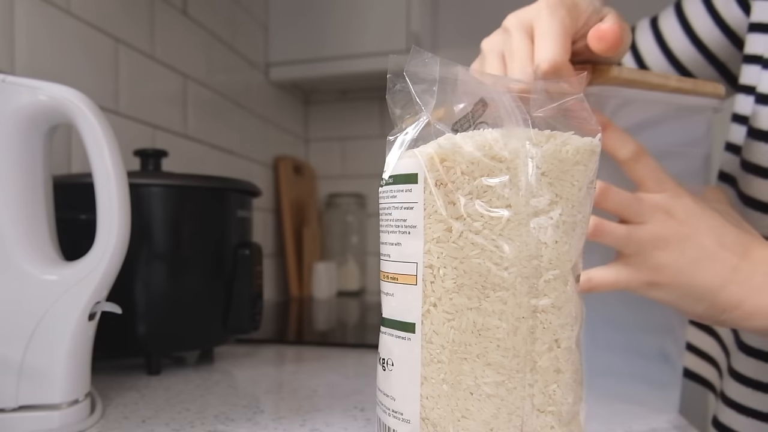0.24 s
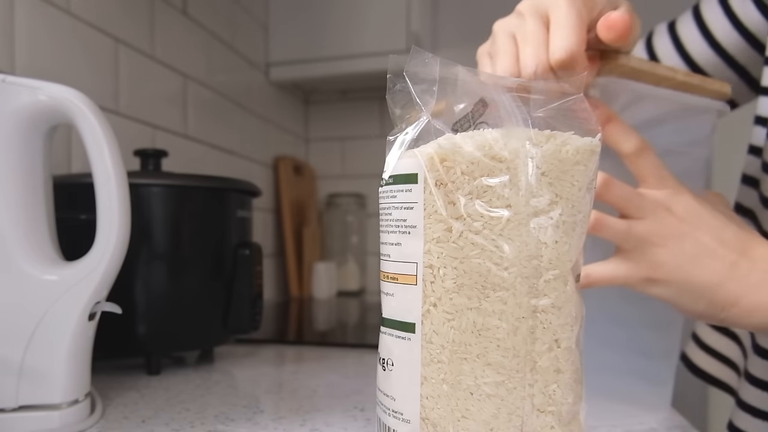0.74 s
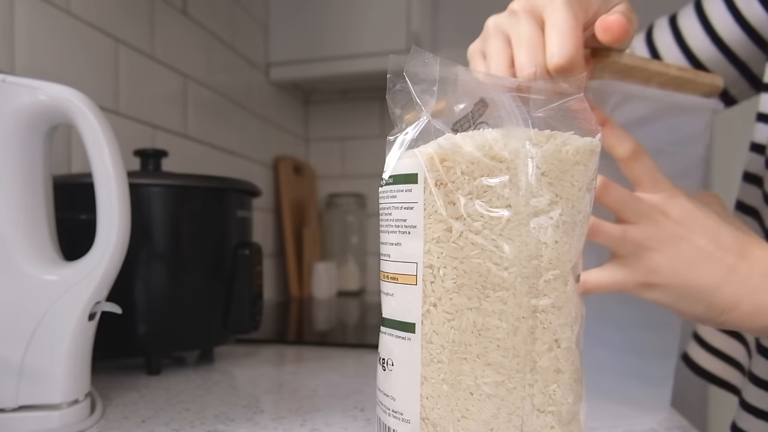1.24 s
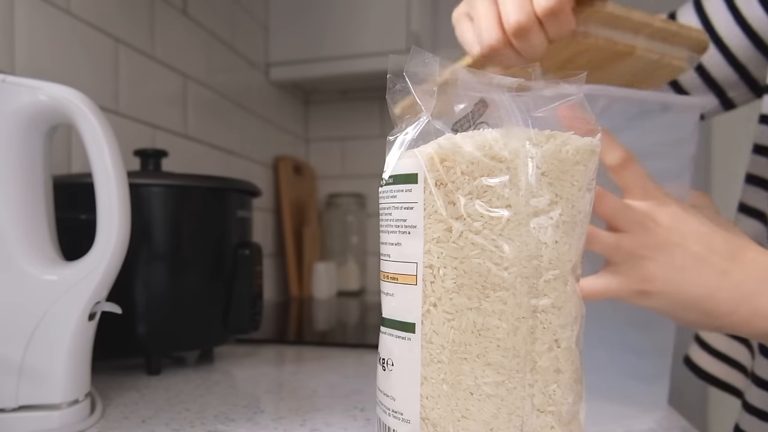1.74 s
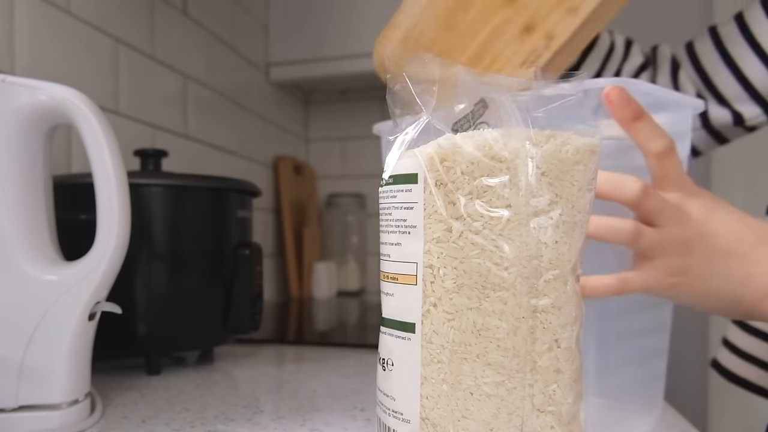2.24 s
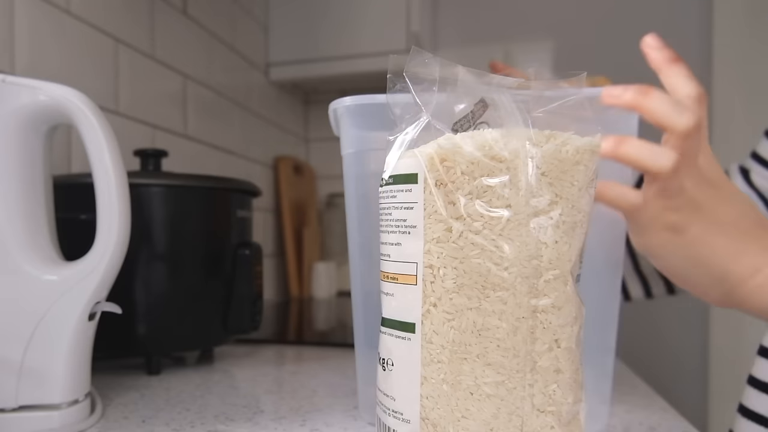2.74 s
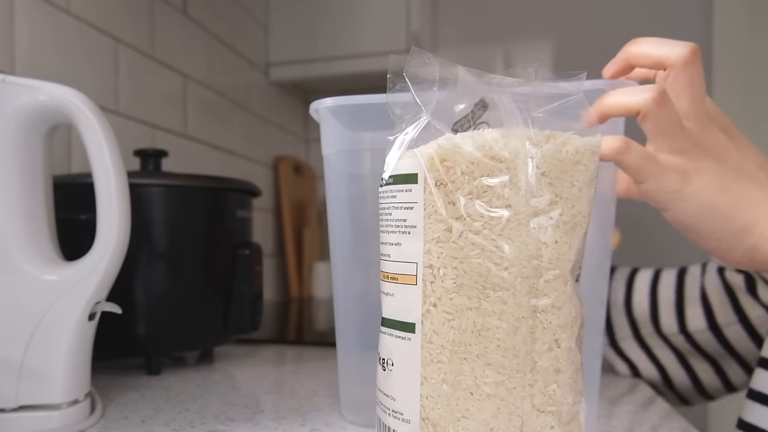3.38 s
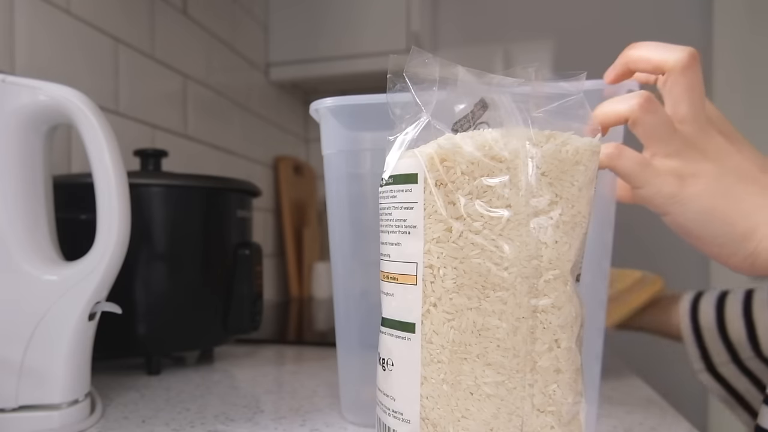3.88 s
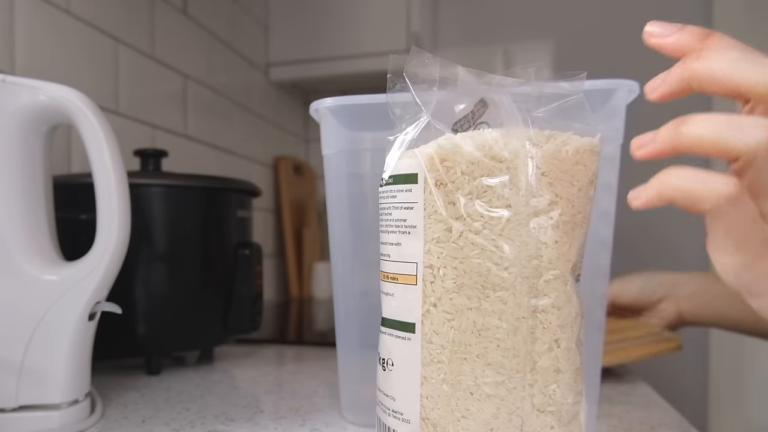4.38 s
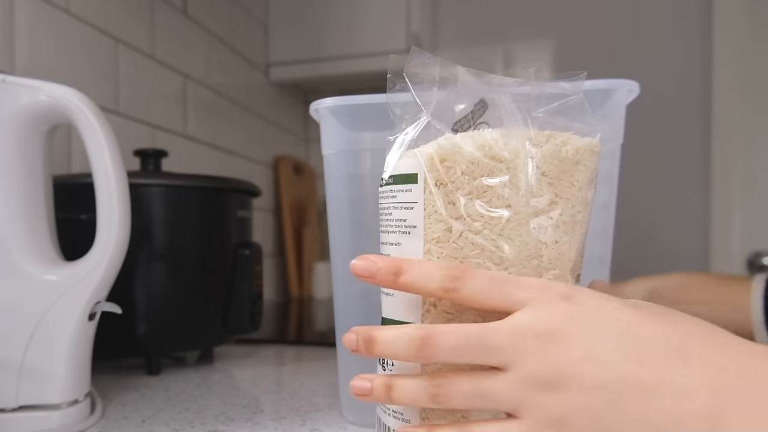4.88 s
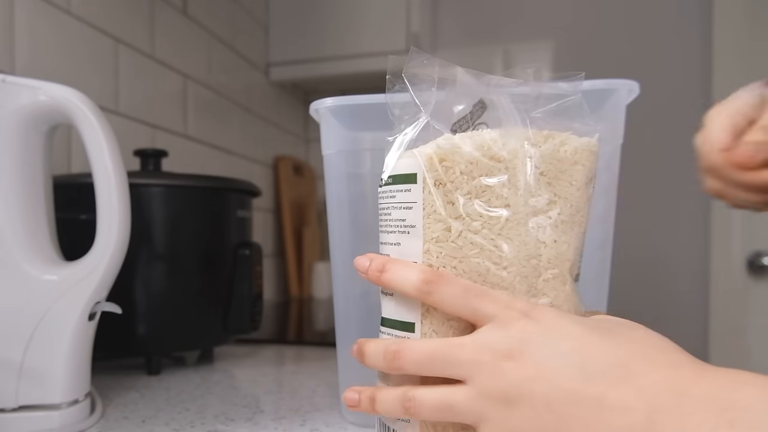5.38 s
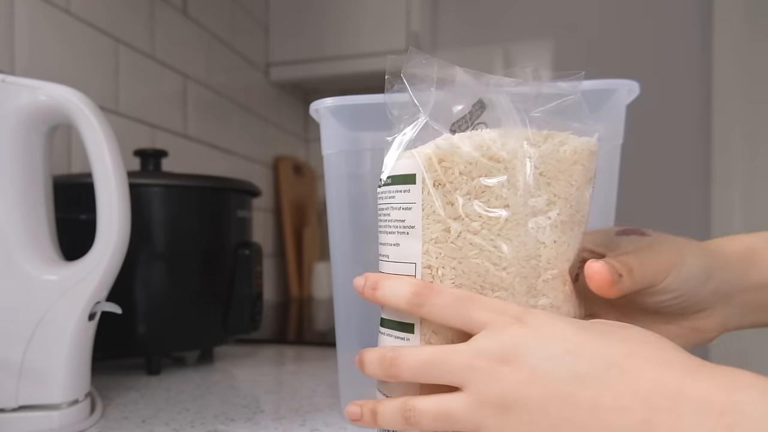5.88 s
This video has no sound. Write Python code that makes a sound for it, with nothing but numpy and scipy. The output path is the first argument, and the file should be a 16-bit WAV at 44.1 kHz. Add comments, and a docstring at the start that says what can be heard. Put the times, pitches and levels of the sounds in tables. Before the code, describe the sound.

Close by, an empty plastic container scuffs softly along a worktop, then gives a run of hollow knocks and snaps as its lid comes free. After some faint scraping and cloth rustle, the wooden lid bumps the counter and, a little later, rattles down flat. A light tap on the container follows. A fridge hums quietly throughout, and each knock echoes briefly in the small kitchen.

```python
"""A small tiled kitchen. An empty plastic tub hisses across the counter, and its wooden lid is prised
off in a few hollow pops: each slip of the seal makes the tub ring. The lid knocks on the worktop and is
laid down with a clatter, a quick run of tiny blows. Sleeves and palms rub, making soft noise, as a hand
takes hold of a bag of rice. A fridge motor hums behind it all, and the knocks echo off the tiles."""
import sys
import numpy as np
from scipy import signal
from scipy.fft import rfft, irfft
from scipy.io import wavfile

SR = 44100
rng = np.random.default_rng(int(sys.argv[2]) if len(sys.argv) > 2 else 0)


def dump_mix(stems):
    """Bounce the given channels to the path in sys.argv[1] as a 16-bit WAV at rate SR."""
    frames = np.atleast_2d(stems).T  # one column per channel
    limited = np.clip(frames, -1, 1)  # hard clip at full scale
    pcm = np.round(limited * 32767).astype(np.int16)
    wavfile.write(sys.argv[1], SR, pcm)


N = 269892
TIME = np.arange(N) / SR

# Tones heard when the tub is struck; the lowest are the counter and room booming:
# pitch_hz, level_db, ring_s (time to fade by 60 dB)
TUB_HIT_TONES = [(136.2, -33.5, 0.36), (163.4, -24, 0.54), (189.1, -24, 0.2), (216.8, -30, 0.36),
                 (320.5, -21.5, 0.13), (359.8, -21, 0.072), (463, -17, 0.04), (635, -33, 0.066),
                 (850, -33.5, 0.15), (1456, -44.5, 0.14), (1790, -40.5, 0.097), (2180, -28, 0.013),
                 (3760, -62, 0.14)]
# Jolts from the seal or a hand: start_s, blow_db, hardness_hz, crack_db, favoured_hz, touch_lead_s
TUB_JOLTS = [(0.684, -38, 198, -50, 168, 0.0018), (1.4149, -8, 235, -17, 199, 0.004),
             (1.4247, -25, 230, -14, 185, 0.0043), (1.4551, -9, 1990, -0.5, 368, 0.006),
             (1.518, -17.5, 800, -19, 390, .0025), (1.7248, -5, 1990, -1, 385, 0.0026),
             (1.851, -23, 595, -27, 405, 0.0018), (1.92, -18, 1400, -30, 376, 0.0028),
             (2.003, -2.5, 2200, -0.5, 294, 0.0038), (2.14, -23, 503, -28, 332, 0.0031),
             (2.805, -25.5, 203, -57, 186, 0.0027), (5.577, -16.5, 980, -19.5, 500, 0.0031)]
# Thin plastic at the rim and under the fingers: start_s, level_db, pitch_hz, width_hz, ring_s
PLASTIC_TICKS = [(0.138, -40, 3110, 1930, 0.017), (0.363, -45, 565, 500, 0.039),
                 (0.724, -49, 2370, 2000, 0.034), (1.427, -36.5, 4090, 500, 0.061),
                 (1.437, -35.5, 2555, 1400, 0.028), (1.712, -44.5, 1880, 700, 0.04),
                 (1.917, -50, 4650, 1080, 0.027), (1.979, -43, 3970, 6000, .012),
                 (1.9995, -25.5, 2203, 1500, .02), (2.922, -51, 3570, 350, 0.094),
                 (5.28, -63.5, 3510, 600, 0.48), (5.929, -43, 4100, 2750, 0.013)]
# Pushes on the tub: start_s, rise_s, hold_s, hiss_db, speed_0_to_1, sing_db, rest_hz, top_hz
TUB_PUSHES = [(0.03, .2, 0.14, -50, 0.99, -56, 3860, 6480),
              (0.897, 0.088, .05, -50, 0.57, -49.5, 4900, 4900)]
# Tones heard when the lid is struck on its edge or face; the lowest are the counter and room booming:
# pitch_hz, edge_db, face_db, ring_s
LID_HIT_TONES = [(91.3, -33, -59, 0.34), (130.7, -18.5, -38, 0.24), (169.4, -18.5, -23.5, 0.21),
                 (193.3, -12.5, -22.5, 0.13), (201.7, -15.5, -19, 0.12), (270, -53.5, -12.5, 0.18),
                 (322, -28.5, -16.5, 0.16), (420, -17, -19, 0.1), (496.4, -10, -22, 0.071),
                 (575, -12, -18, 0.062), (650, -3, -42.5, 0.013), (720, -17.5, -34, 0.11),
                 (765, -15.5, -11, 0.046), (920, -31.5, -27.5, 0.089), (1110, -34, -49.5, 0.032),
                 (1291, -11.5, -51, 0.042), (1505, -52, -20, 0.12), (1650, -22, -17, 0.027),
                 (1846, -19.5, -18, 0.04), (1990, -32, -11.5, 0.015), (2200, -31, -56, 0.02),
                 (2900, -33, -17, 0.021), (3780, -38.5, -54, 0.14), (3970, -83, -16, 0.046)]
# The lid lands: start_s, edge_db, face_db, tipping_s, hardness_hz, crack_db, favoured_hz
LID_LANDINGS = [(3.2884, -2, -7, 0.0033, 2230, -1, 580), (3.323, -7.5, -33, 0.0029, 250, -13, 130),
                (3.3391, -26, -9.5, 0.0019, 700, -15, 194), (3.433, -36, -24.5, 0.00194, 890, -42, 554),
                (4.247, -55, -22.5, 0.0017, 350, -40, 320), (4.8938, -13, 0, 0.002256, 3020, -3.5, 556)]
# The lid skids: start_s, blow_db, first_hardness_hz, crack_db, favoured_hz, first_gap_s
LID_SKIDS = [(4.219, -26.5, 700, -31, 517, .0046), (4.8528, -10.5, 1140, -11.5, 836, .00455)]
# Scrapes along the worktop: middle_s, length_s, level_db, favoured_hz
TUB_DRAGS = [(0.7, 0.12, -51.5, 163), (2.28, 0.13, -45, 326), (2.48, 0.17, -50.5, 232),
             (2.85, 0.36, -59, 310)]
LID_SCUFFS = [(4.065, 0.045, -52, 532), (4.345, 0.018, -53, 800), (4.43, 0.5, -62, 940)]
# Strokes of sleeves and palms: middle_s, length_s, level_db, brightness_0_to_1
SLEEVE_STROKES = [(2.204, 0.36, -57.5, 0.34), (2.394, 0.049, -58, 0.9), (2.494, .16, -63, 0),
                  (3.587, 0.23, -67, .5), (4.02, 0.23, -58, 0.92), (4.067, 0.08, -53.5, 0.92),
                  (4.178, 0.099, -56, .7), (4.503, 0.3, -55, 0.2), (5.325, 0.18, -71.5, 1),
                  (5.84, 0.25, -64.5, 1), (6.12, 0.086, -63.5, 0.2)]
# The fridge motor's tones: pitch_hz, level_db, waver_radians
MOTOR_TONES = [(49.4, -58, .1), (100.2, -60, 1.24), (286, -70, 0.85), (512, -82.5, 0.55),
               (1068, -71.5, 2.06), (1190, -76, 1.7), (1270, -77, 4)]
# Noise colours, or how strong each pitch is in a noise: pitch_hz, level_db
TUB_CRACK_COLOUR = [(150, 13), (600, 14.5), (1200, 1.5), (2200, 7.5), (3000, 3), (4500, 1), (7000, -3.5),
                    (10000, -14.5), (15500, -26)]  # crowded, fast-dying tones, heard as a crack
LID_CRACK_COLOUR = [(100, -27), (400, 0), (900, 1), (1250, 1.5), (1480, -15), (1850, -4), (2500, -16),
                    (3700, -22), (5000, -30.5), (8000, -40), (15500, -61)]
SLOW_SLIDE_COLOUR = [(300, -45), (1400, -22), (2400, 1), (3300, -2), (4300, 1.5), (6000, -2), (8000, -15),
                     (11500, -12), (13200, -11.5), (15500, -18)]
FAST_SLIDE_COLOUR = [(300, -14), (1400, -8.5), (2300, 1.5), (3300, -1.5), (5000, 4.5), (6800, -2.5),
                     (9300, -3), (11500, -15), (13500, -22), (15500, -32)]
DULL_CLOTH_COLOUR = [(150, -21), (400, -9.5), (900, -3.5), (1900, -7), (2500, -8.5), (4500, -12.5),
                     (8000, -25), (15500, -48)]
BRIGHT_CLOTH_COLOUR = [(200, 0.5), (1500, -11.5), (4500, -4), (8000, -11), (11000, -16.5), (15500, -24.5)]
AIR_COLOUR = [(20, -10.5), (32, 6), (62, -3), (82, -5), (120, -4), (200, -2.5), (400, -10), (700, -16.5),
              (1050, -9), (1270, -10), (1450, -27), (2200, -29.5), (3300, -17.5), (4200, -28.5),
              (10000, -31.5), (15500, -42)]  # the kitchen at rest
ECHO_COLOUR = [(100, -10), (190, -8.5), (300, 0.5), (500, 0.5), (1200, 3), (2000, 3), (5000, 9),
               (14000, -2)]
# How long the room echoes: pitch_hz, ring_s
ECHO_TIMES = [(150, 0.58), (500, 0.37), (1500, 0.41), (3000, 0.29), (6000, 0.28), (14000, 0.14)]
# How alike the left and right microphones sound: pitch_hz, likeness_0_to_1
STEREO_LIKENESS = [(100, 0.9), (300, 0.9), (600, 0.69), (1200, 0.6), (2500, 0.54), (5000, 0.09),
                   (10000, 0.053)]


def tub_pops(rebound_s=0.0215, rebound_hz=456):
    """Each time the seal slips there is a light touch, a hollow boom, and a soft rock back."""
    out = np.zeros((2, N))
    for start, blow_db, hard_hz, crack_db, spot_hz, lead in TUB_JOLTS:
        touch = (-lead, blow_db - 7.5, crack_db - 35, hard_hz)
        boom = (0, blow_db, crack_db - 26, hard_hz)
        rebound = (rebound_s, blow_db - 12, crack_db - 48, min(hard_hz, rebound_hz))
        for delay, body_db, snap_db, cutoff_hz in (touch, boom, rebound):
            pop = strike(TUB_HIT_TONES, body_db, cutoff_hz, spot_hz, TUB_CRACK_COLOUR, snap_db,
                         crack_s=0.06, rise_s=0.000086)
            add(out, start + delay, pop)
    return out


def lid_knocks(edge_flatness=0.079, face_flatness=0.7):
    """The lid lands on its edge, which favours higher tones, then tips and slaps down."""
    out = np.zeros((2, N))
    for start, edge_db, face_db, tipping, hard_hz, crack_db, spot_hz in LID_LANDINGS:
        add(out, start, lid_contact(edge_flatness, edge_db, hard_hz, spot_hz * 1.66, crack_db))
        add(out, start + tipping, lid_contact(face_flatness, face_db, hard_hz, spot_hz, crack_db))
    return out


def lid_rattles(contacts=6, flatness=0.89):
    """The skidding lid chatters; each contact is harder and comes after a slightly longer gap."""
    out = np.zeros((2, N))
    for start, blow_db, hard_hz, crack_db, spot_hz, gap in LID_SKIDS:
        for k in range(contacts):
            arch_db = -0.85 * (k - 1.5) ** 2  # the run swells, then dies
            tap = lid_contact(flatness, blow_db + arch_db, hard_hz * 1.41 ** k, spot_hz,
                              crack_db + arch_db)
            add(out, start + gap * k ** 1.1, tap)
    return out


def lid_contact(flatness, blow_db, hard_hz, spot_hz, crack_db):
    """The wooden lid hits the worktop once."""
    return strike(landing_tones(flatness), blow_db, hard_hz, spot_hz, LID_CRACK_COLOUR, crack_db - 13,
                  crack_s=0.038, rise_s=0.00076)


def landing_tones(flatness):
    """The mix of tones depends on how the lid lands: 0 is on its edge, 1 is flat on its face."""
    return [(hz, edge + flatness * (face - edge), ring_s) for hz, edge, face, ring_s in LID_HIT_TONES]


def strike(tones, blow_db, hard_hz, spot_hz, crack_colour, crack_db, crack_s, rise_s):
    """A blow sets tones ringing and adds a noisy crack; a soft blow (low hard_hz) rings dull."""
    soften = signal.butter(2, hard_hz, fs=SR)
    body = signal.lfilter(*soften, ring(favour(tones, spot_hz)))
    t = np.arange(len(body)) / SR
    burst = (1 - np.exp(-(t / rise_s) ** 2)) * decay(t, crack_s)
    crack = noise(crack_colour, size=len(t), ripple_db=-1.5, ripple_hz=124.6)
    crack = unit(crack + 0.071 * crack[::-1])  # both microphones share the direct sound
    return amp(blow_db) * body + amp(crack_db) * burst * crack


def ring(tones):
    """The ringing after a blow is a sum of fading sine waves; neighbours swing opposite ways."""
    t = np.arange(SR // 3) / SR
    return sum((-1) ** k * amp(db) * decay(t, ring_s) * np.sin(2 * np.pi * hz * t)
               for k, (hz, db, ring_s) in enumerate(tones))


def favour(tones, spot_hz, boost_db=6, width=0.16):
    """The spot that is touched brings out the tones near spot_hz."""
    return [(hz, db + boost_db * np.exp(-(np.log(hz / spot_hz) / width) ** 2), ring_s)
            for hz, db, ring_s in tones]


def plastic_ticks(attack_share=0.047):
    """Thin plastic snaps and squeaks, each around one pitch; longer ones start more gently."""
    out = np.zeros((2, N))
    t = np.arange(SR // 4) / SR
    for start, db, hz, width_hz, ring_s in PLASTIC_TICKS:
        shape = (1 - np.exp(-t / (attack_share * ring_s))) * decay(t, ring_s)
        add(out, start, amp(db) * whistle(hz, width_hz, size=len(t)) * shape / shape.max())
    return out


def tub_slide(stop_s=1.46, braking_s=0.096):
    """Each push builds, holds and tires; the tub's foot sings and hisses, brighter with speed."""
    out = np.zeros((2, N))
    for start, rise, hold, hiss_db, speed, sing_db, rest_hz, top_hz in TUB_PUSHES:
        t = TIME - start
        build = np.sin(np.pi / 2 * np.clip(t / rise, 0, 1)) ** 2
        fade = amp(-15 * np.maximum(t - rise - hold, 0))
        pace = np.sqrt(build * fade)
        out += amp(hiss_db) * build * fade * rub(speed * pace, SLOW_SLIDE_COLOUR, FAST_SLIDE_COLOUR)
        singing = whistle(rest_hz + (top_hz - rest_hz) * pace, width_hz=780)
        out += amp(sing_db) * build ** 0.45 * fade ** 2.9 * singing  # starts sooner, dies faster
    return out * np.clip((stop_s - TIME) / braking_s, 0, 1)  # the tub halts as the seal gives


def drag(strokes, tones, above_hz):
    """Tiny random slips of a dragged object keep the tones ringing through each stroke."""
    slips = rng.standard_normal(N) * amp(0.8 * wander(27))
    slips = signal.lfilter(*signal.butter(2, above_hz, "highpass", fs=SR), slips)
    out = np.zeros(N)
    for middle, length, db, spot_hz in strokes:
        ringing = ring(favour(tones, spot_hz, boost_db=11, width=0.14))
        drone = unit(signal.oaconvolve(slips, ringing)[:N])
        out += amp(db) * swell(middle, length) * drone
    return out


def sleeves(rustle_db=-66.5, rustle_brightness=0.23):
    """Cloth and skin rub in uneven strokes, some dull and some bright, over a faint rustle."""
    power = amp(rustle_db) ** 2
    bright_power = power * rustle_brightness
    for middle, length, db, brightness in SLEEVE_STROKES:
        stroke_power = (amp(db) * swell(middle, length)) ** 2
        power += stroke_power
        bright_power += stroke_power * brightness
    grain = amp(0.96 * wander(105))
    return np.sqrt(power) * grain * rub(bright_power / power, DULL_CLOTH_COLOUR, BRIGHT_CLOTH_COLOUR)


def kitchen_echo(sound, gap_s=0.0031, build_s=0.004):
    """Echoes off tiles and cupboards thicken into a short tail whose treble dies first."""
    hz, t, bands = signal.stft(noise(ECHO_COLOUR, size=SR * 3 // 4), SR, nperseg=256)
    bands = bands * decay(t, read(ECHO_TIMES, hz)[:, None])
    _, tail = signal.istft(bands, SR, nperseg=256)
    tail *= np.clip((np.arange(tail.shape[1]) / SR - gap_s) / build_s, 0, 1)
    tail /= np.linalg.norm(tail[0])
    return signal.fftconvolve(sound.mean(0)[None], tail, axes=1)[:, :N]


def fridge():
    """The motor hums in a few tones that waver in pitch and level."""
    hum = np.zeros(N)
    for hz, db, waver in MOTOR_TONES:
        sway_db = 3 * min(waver, 1) * wander(1.57)
        phase = 2 * np.pi * hz * TIME + waver * wander(5.6)
        hum += amp(db + sway_db) * np.sqrt(2) * np.sin(phase)
    return hum


def room_air(level_db=-56.5):
    """The air of the room makes a low, steady hush."""
    return amp(level_db) * noise(AIR_COLOUR, ripple_db=0.5, ripple_hz=32.4)


def rub(share, first, second):
    """Rubbing noise that passes from the first colour to the second as share goes from 0 to 1."""
    share = np.clip(share, 0, 1)
    return (np.sqrt(1 - share) * noise(first, ripple_db=3.4)
            + np.sqrt(share) * noise(second, ripple_db=3.4))


def whistle(hz, width_hz, size=N):
    """A band of noise around one pitch, which may glide."""
    smooth = signal.butter(2, width_hz / 2, fs=SR)
    fuzz = signal.lfilter(*smooth, rng.standard_normal((2, size)) + 1j * rng.standard_normal((2, size)))
    phase = 2 * np.pi * np.cumsum(hz * np.ones(size)) / SR
    return unit((fuzz * np.exp(1j * phase)).real)


def noise(colour, size=N, ripple_db=0, ripple_hz=70):
    """Stereo noise, alike on both sides in the bass; small random peaks and dips make it ring a bit."""
    hz = np.fft.rfftfreq(size, 1 / SR)
    mid, side = rfft(rng.standard_normal((2, size)))
    alike = read(STEREO_LIKENESS, hz)
    mid, side = mid * np.sqrt(1 + alike), side * np.sqrt(1 - alike)
    ripple = np.interp(hz / ripple_hz, np.arange(SR // 20), rng.standard_normal(SR // 20))
    gain = amp(read(colour, hz) + ripple_db * ripple)
    return unit(irfft(np.array([mid + side, mid - side]) * gain, size))


def wander(rate, size=8192):
    """A smooth random curve that changes about rate times a second."""
    step = N / SR / size
    keep_slow = np.exp(-(np.fft.rfftfreq(size, step) / rate) ** 2)
    curve = irfft(rfft(rng.standard_normal(size)) * keep_slow, size)
    return np.interp(TIME, np.arange(size) * step, unit(curve))


def swell(middle, length):
    """A stroke speeds up and slows again in one smooth hump."""
    return np.exp(-2 * ((TIME - middle) / length) ** 2)


def decay(t, ring_s):
    """Fades by 60 dB every ring_s seconds."""
    return np.exp(-np.log(1000) * t / ring_s)


def amp(db):
    """Turns decibels into a gain."""
    return 10 ** (np.asarray(db) / 20)


def unit(x):
    """Scales a signal to an average power of one."""
    return x / np.sqrt(np.mean(x ** 2) + 1e-20)


def read(points, hz):
    """Looks up a value between a table's rows, on a musical (logarithmic) pitch scale."""
    pitches, values = np.transpose(points)
    return np.interp(np.log(hz + 1), np.log(pitches + 1), values)


def add(mix, start_s, sound):
    """Mixes a sound in at start_s."""
    part = mix[:, round(start_s * SR):][:, :sound.shape[-1]]
    part += sound[..., :part.shape[1]]


def scene(tub_echo_db=-10, lid_echo_db=-11, tub_left_db=-0.3, lid_left_db=-0.6):
    """Tub, lid and hands in the kitchen, all near the centre."""
    tub = tub_pops() + plastic_ticks()
    lid = lid_knocks() + lid_rattles()
    echo = kitchen_echo(amp(tub_echo_db) * tub + amp(lid_echo_db) * lid)
    tub += tub_slide() + drag(TUB_DRAGS, TUB_HIT_TONES, above_hz=240)
    lid += drag(LID_SCUFFS, landing_tones(flatness=0.92), above_hz=430)
    tub[0] = amp(tub_left_db) * np.roll(tub[0], 2)  # reaches the left microphone slightly later
    lid[0] *= amp(lid_left_db)
    return tub + lid + echo + sleeves() + fridge() + room_air()


def record(dry, threshold_db=-24, squeeze=0.69, release_db_per_s=45, top_hz=15750):
    """The volume dips after the loudest knocks and recovers; the highest treble is cut off."""
    memory = np.exp(-1 / (0.011 * SR))
    smooth = ([1 - memory], [1, -memory])  # averages over about 11 ms
    power_db = 10 * np.log10(signal.lfilter(*smooth, (dry ** 2).mean(0)) + 1e-12)
    fall_db = TIME * release_db_per_s
    peak_db = np.maximum.accumulate(power_db + fall_db) - fall_db  # jumps up, then sinks steadily
    over_db = np.maximum(peak_db - threshold_db, 0)
    dipped = dry * amp(-squeeze * signal.lfilter(*smooth, over_db))
    treble_cut = signal.firwin(511, top_hz, window=("kaiser", 9), fs=SR)
    return signal.oaconvolve(dipped, treble_cut[None], "same")


dry = scene()
out = record(dry)
dump_mix(out)
```